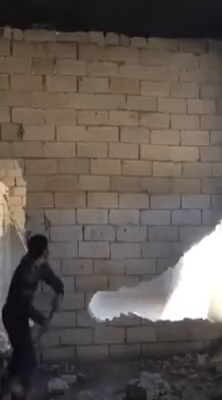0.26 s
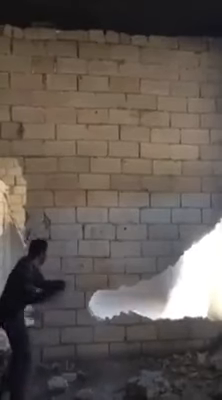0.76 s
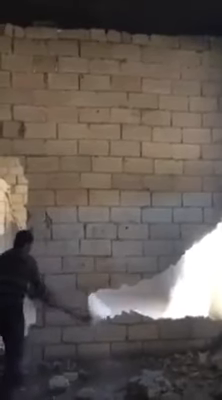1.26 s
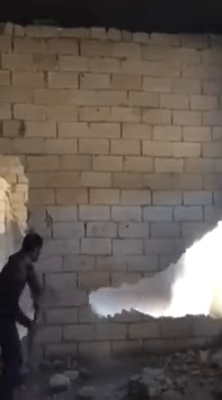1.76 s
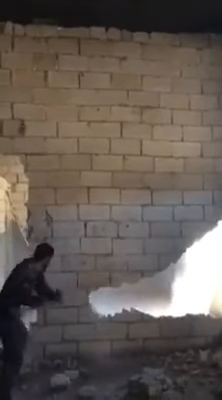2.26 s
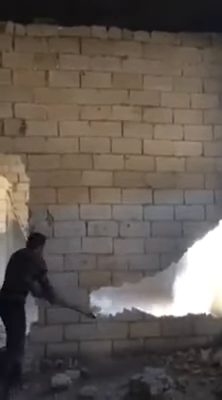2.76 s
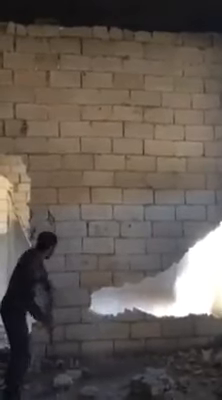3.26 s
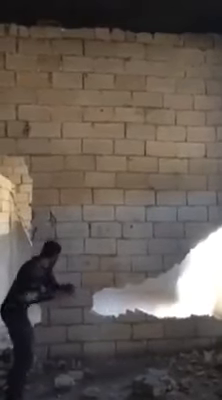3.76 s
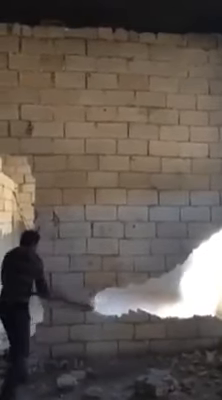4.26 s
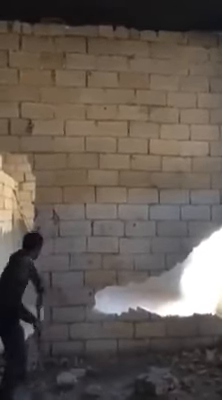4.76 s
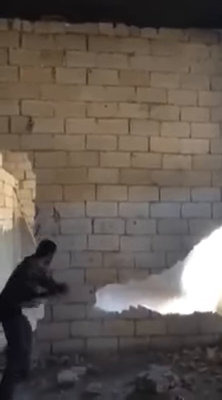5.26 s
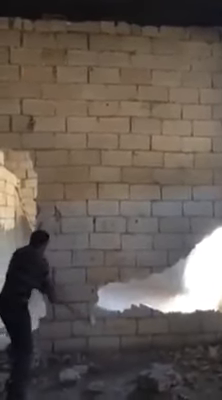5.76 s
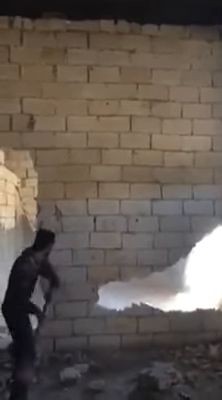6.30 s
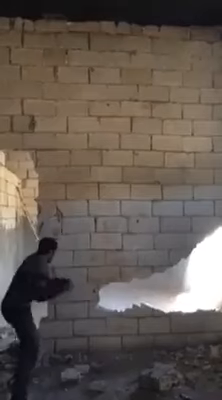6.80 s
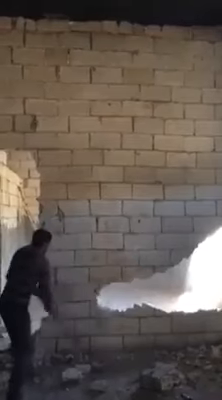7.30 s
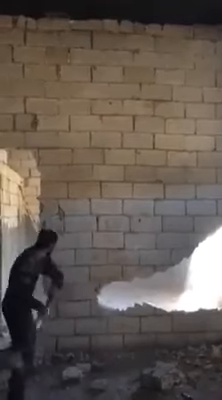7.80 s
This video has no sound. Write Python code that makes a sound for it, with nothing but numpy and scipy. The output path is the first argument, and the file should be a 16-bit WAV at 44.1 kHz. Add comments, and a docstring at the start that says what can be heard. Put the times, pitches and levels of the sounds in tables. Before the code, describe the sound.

A heavy hammer hits a concrete-block wall about every one and a half seconds. Each blow is a deep short thud with a hard knock and gritty crack, followed by fluttering slap echoes and a boomy tail lasting over a second. Between blows small chips patter down and rubble shifts faintly underfoot. The microphone stands some distance away in a bare, reverberant hall, with soft low rumble and hiss behind.

```python
"""Sledgehammer in a bare hall

A sledgehammer hits a block wall every second and a half: decaying sine thud, filtered-click knock and crack.
The reverberant field is band-wise decaying noise with sine room modes; discrete reflections are added.
Chips and shifting feet are swarms of filtered clicks; a short squeak, rumble and hiss are filtered noise.
The recorder's gain control holds the peaks down, then a soft limit and a low-pass follow."""
import sys
import numpy as np
from scipy import signal
from scipy.fft import rfft
from scipy.io import wavfile

SR = 44100
rng = np.random.default_rng(int(sys.argv[2]) if len(sys.argv) > 2 else 0)


def transcribe(u):
    """Save the signal u as a 16-bit wav file named by the first command-line argument.

    u: samples, shape (n,) or (channels, n), limited to [-1, 1]; the rate is SR.
    q: integer samples, one column per channel.
    """
    v = np.clip(np.atleast_2d(u).T, -1, 1)
    q = np.round(v * 32767).astype(np.int16)
    wavfile.write(sys.argv[1], SR, q)


N = 354563
BEFORE = 13230   # samples computed ahead of the start, so that an earlier blow still rings
M = N + BEFORE


def from_db(db):
    """Level to amplitude ratio: 20 dB is a factor of ten."""
    return 10 ** (np.asarray(db) / 20)


def rms_one(x):
    """Normalise a signal to unit effective (rms) value."""
    return x / np.sqrt(np.mean(x ** 2) + 1e-20)


def at_hz(table, hz, column=1):
    """Interpolate a table column linearly along a logarithmic frequency axis."""
    table = np.array(table)
    return np.interp(np.log(hz), np.log(table[:, 0]), table[:, column])


def band(x, low_hz, high_hz):
    """Butterworth band-pass: flat between the edges, gentle slopes outside."""
    edges = [low_hz, min(high_hz, .45 * SR)]
    return signal.sosfilt(signal.butter(2, edges, "band", fs=SR, output="sos"), x)


def fade(size, t60):
    """Exponential decay: the level falls 60 dB in t60 seconds."""
    return from_db(-60 * np.arange(size) / SR / t60)


def add(out, s, x):
    """Linear superposition: mix x into out at s seconds."""
    i = round(s * SR) + BEFORE
    out[i:i + len(x)] += x[:M - i]


def bands():
    """Half-octave analysis: lower edge, upper edge and geometric centre of each band, in Hz."""
    edges = 22 * 2 ** np.arange(0, 10, .5)
    return zip(edges, edges[1:], np.sqrt(edges[:-1] * edges[1:]))


# Spectrum of the background, before it is normalised: [f/Hz, relative density level/dB per Hz]
AIR = [(15, -42), (25, -9), (121, 14), (207, -6), (373, 0.5), (1090, -7.5), (2430, -9.5), (2700, -39),
       (3440, -9), (8000, -24), (11000, -30.5), (15000, -30)]
AIR_DB = -55   # rms level of the whole background


def air():
    """Stationary noise shaped in bands: far outdoor rumble that wavers, and the hiss of the microphone."""
    white = rng.standard_normal((2, M))
    turning_points = rng.standard_normal(40)   # 4 per second
    waver = rms_one(np.interp(np.arange(M) / SR, np.arange(40) / 4, turning_points))
    total = np.zeros(M)
    for k, (low, high, hz) in enumerate(bands()):
        level_db = at_hz(AIR, hz) + 3.7 * waver * (hz < 250)   # only the rumble wavers
        total += from_db(level_db) * band(white[k % 2], low, high)   # neighbouring bands are independent
    return from_db(AIR_DB) * rms_one(total)


# a higher thud goes with a lower knock and a stronger boom: values at a thud of THUD_HZ, slopes per Hz of thud
THUD_HZ = 160
KNOCK_HZ, KNOCK_SLOPE, BOOM_DB, BOOM_SLOPE_DB = 458, -8, -11, 0.18


def blow(thud_hz, thud_db, knock_db, crack_db, crack_hz, spray_db):
    """Impulse excitation: the panel swings, the wall booms, the block knocks, the steel cracks."""
    size = 2048
    t = np.arange(size) / SR - .010   # contact comes 10 ms in
    since = np.maximum(t + 0.0028, 0)
    onset = 1 - np.exp(-since / 0.00085)
    swing = -np.sin(2 * np.pi * thud_hz * since) * onset * np.exp(-(since / 0.011) ** 2)

    # the ground carries a weak forerunner faster than the air
    early = np.maximum(t + 0.00573, 0)
    envelope = early / 0.0021 * np.exp(-early / 0.0031)
    forerunner = from_db(-6) * np.sin(2 * np.pi * 280 * early) * envelope

    click = 1. * (np.arange(size) == 441)   # unit impulse at contact
    knock_hz = KNOCK_HZ + KNOCK_SLOPE * (thud_hz - THUD_HZ)
    boom_db = BOOM_DB + BOOM_SLOPE_DB * (thud_hz - THUD_HZ)
    boom = band(click, 67.4, 150)
    knock = band(click, knock_hz / 4.4, knock_hz * 1.647)
    crack = band(click, crack_hz / 1.7, crack_hz * 1.4)
    spray = band(click, 657, 8700)
    levels = [(boom_db, boom), (knock_db, knock), (crack_db, crack), (spray_db, spray)]
    struck = [from_db(db) * x / x.max() for db, x in levels]
    return np.array([from_db(thud_db) * (swing + forerunner), *struck])


# Late decay of the hall by frequency: [f/Hz, reverberation time t60/s, level/dB before the early boost]
HALL = [(30.4, 2.26, -36), (60, 2, -31), (120, 1.66, -35.5), (191, 1.45, -34.5), (348, 1.84, -24),
        (635, 1.553, -28), (1534, 1.417, -24.5), (2800, 1.253, -23.5), (5000, 0.68, -25), (8000, 0.25, -26),
        (13000, 1.11, -58)]
# Low resonances of the air in the hall: [f/Hz, level/dB before the early boost, t60/s]
HALL_MODES = [(69.7, -66.5, 2.7), (109.3, -67.5, 2.32), (119.3, -62.5, 2.23), (143.6, -69.5, 2.4),
              (223.5, -60, 1.58), (275.3, -67, 2.22), (340, -67.5, 2.4), (408, -65, 1.6), (504, -60, 1.82),
              (581, -60, 2.1)]


def echoes(strength, count):
    """Reverberation: dense echoes that die band by band, over slow low modes of the air."""
    size = 75000
    t = np.arange(size) / SR
    white = rng.standard_normal((2, count, size))
    out = np.zeros((count, size))
    for k, (low, high, hz) in enumerate(bands()):
        build_up = np.clip(t / (0.0027 + 4.7 / hz), 0, 1) ** 2   # the bass builds up later
        swell = build_up * fade(size, at_hz(HALL, hz))
        level = from_db(at_hz(HALL, hz, column=2)) * strength(hz)
        out += level * band(white[k % 2], low, high) * swell
    for hz, level_db, t60 in HALL_MODES:
        phase = rng.random((count, 1))   # in cycles
        ring = np.sin(2 * np.pi * (hz * t + phase)) * np.clip(t / 0.031, 0, 1) * fade(size, t60)
        out += from_db(level_db) * strength(hz) * ring
    # the struck wall and the floor nearby answer first and strongest
    close = 1 + from_db(-8.5) * fade(size, 0.33)
    return out * close


# Hammer blows; crack and spray levels precede the gain towards the microphone: [contact t/s, thud f/Hz,
# thud level/dB, knock level/dB, crack level/dB, crack f/Hz, spray of chips level/dB, chips landing level/dB]
BLOWS = [(-.17, 150, -5.5, -2, -20, 2270, 3, -47), (1.343, 166.3, -2, -3.5, -13.5, 1970, -7.5, -54.5),
         (2.8834, 133.4, -5.5, -4.5, -6.5, 3140, -2.5, -54),
         (4.4073, 156.7, -3.5, -1, -15, 2010, -0.5, -75), (5.8869, 167.2, 2.5, 0.5, -17, 2690, -2.5, -66),
         (7.337, 175, 4, 0.5, -17.5, 4040, -19, -60)]


def blows():
    """Direct sound, discrete reflections and reverberation, the last fed with the power of the five parts."""
    out = np.zeros(M)
    parts = np.array([blow(*row[1:-1]) for row in BLOWS])
    fft_size = 2 ** 14
    power = np.sum(np.abs(rfft(parts, fft_size)) ** 2, axis=1)
    tails = echoes(lambda hz: np.sqrt(power[:, [round(hz / SR * fft_size)]]), count=len(BLOWS))
    # the face of the block breaks for some ms
    size = 400
    crumble = rng.standard_normal((len(BLOWS), size)) * fade(size, .009)
    for row, (thud, boom, knock, crack, spray), grains, tail in zip(BLOWS, parts, crumble, tails):
        start = row[0] - .010
        head_on = from_db(8) * crack + from_db(-3) * spray   # the crack beams towards the microphone
        unit_grains = grains / np.linalg.norm(grains)
        sharp = knock + np.convolve(head_on, unit_grains)[:len(thud)]
        add(out, start, thud + boom + sharp)
        add(out, start + .006, from_db(-7) * sharp)   # the floor throws the crack back
        # the far end wall answers, duller
        add(out, start + 0.142, from_db(-8.5) * band(thud + sharp, 170, 3200))
        for turn in (1, 2, 3):   # the thud flutters between two facing walls
            add(out, start + .092 * turn, from_db(-1.5 - 5.3 * turn) * band(thud, 68, 260))
        add(out, row[0], tail)
    return out


# Rubble sliding or shifting underfoot: [t/s, level at the crest of each grit layer/dB, fall time constant/s,
# centre f/Hz]; the broad layer has a further offset
RUBBLE = [(0.05, -37, .1, 3350), (.54, -61.5, 0.14, 8400), (0.959, -52.5, 0.0038, 2330),
          (1.189, -61.5, 0.051, 5760), (1.25, -53.5, .014, 8500), (1.92, -63, 0.16, 5000),
          (2.07, -58, 0.094, 3600), (2.512, -54.5, 0.049, 2570), (2.672, -61, 0.056, 6060),
          (2.78, -58.5, 0.3, 3960), (3.47, -50.5, .096, 4300), (3.6, -61, 0.22, 5000),
          (3.778, -84, 0.027, 4100), (4.05, -60.5, 0.023, 2940), (4.179, -58.5, 0.092, 3560),
          (4.25, -42.5, 0.023, 5560), (4.295, -43, 0.0094, 710), (5.118, -64, 0.051, 5000),
          (5.605, -62, 0.014, 2090), (5.755, -60, 0.1, 2800), (6.37, -62, .04, 8000),
          (7.115, -73, 0.013, 5000), (7.255, -60.5, 0.037, 1990), (7.742, -42.5, 0.034, 6140),
          (7.848, -56, 0.12, 5500), (7.951, -50.5, 0.028, 6000)]
# chips reach the floor after each blow, and trickle on: delay, fall time constant, centre frequency
CHIPS_DROP_S, CHIPS_LAST_S, CHIPS_HZ = .335, 0.16, 6600
SLIDE_RISE_S, SLIDE_EASE = 0.017, 0.92   # every slide swells alike: time, and power of the ramp
GRIT_DB, GRIT_DB_PER_OCTAVE = -5.5, 4   # broad grit under a 5 kHz slide; finer pieces carry more


def rubble():
    """Shot noise: each slide is a swarm of uneven clicks, coloured by the size of the pieces."""
    out, size = np.zeros(M), 24000
    landings = [(row[0] + CHIPS_DROP_S, row[-1], CHIPS_LAST_S, CHIPS_HZ) for row in BLOWS]
    slides = RUBBLE + landings
    t, shape = np.arange(size) / SR, (len(slides), size)
    sizes_db = 4.5 * np.minimum(rng.exponential(1, shape), 4.0)
    sizes = from_db(sizes_db) * rng.choice([-1, 1], shape)
    clicks = (rng.random(shape) < 6000 / SR) * sizes   # 6000 per second on average
    for (s, crest_db, fall, centre_hz), swarm in zip(slides, clicks):
        rise = np.minimum(t / SLIDE_RISE_S, 1) ** SLIDE_EASE
        swell = rise * np.exp(-np.maximum(t - SLIDE_RISE_S, 0) / fall)
        grit = rms_one(band(swarm, centre_hz / 5.5, centre_hz * 1.35))
        broad_db = GRIT_DB + GRIT_DB_PER_OCTAVE * np.log2(centre_hz / 5000)
        broad = from_db(broad_db) * rms_one(band(swarm, 500, 16400))
        add(out, s, from_db(crest_db) * swell * (grit + broad))
    return out


# One short high squeak: [f/Hz, level at the crest/dB, length/s]
SQUEAK = (6400, -69, 0.045)
SQUEAK_S = 6.705   # start


def squeak():
    """Narrow-band noise under a raised-cosine swell gives a short tone of wavering pitch."""
    hz, level_db, length = SQUEAK
    out, size = np.zeros(M), 4000
    swell = np.sin(np.pi * np.minimum(np.arange(size) / SR / length, 1)) ** 2
    tone = rms_one(band(rng.standard_normal(size), hz * .96, hz * 1.04))
    add(out, SQUEAK_S, from_db(level_db) * swell * tone)
    return out


def scene():
    """Superpose all sources; convolution with an impulse response places the small sounds in the hall."""
    small = rubble() + squeak()
    response = echoes(lambda hz: 1, count=1)[0]
    small = small + from_db(-2) * signal.fftconvolve(small, response)[:M]
    return (blows() + small + air())[None, BEFORE:]


CUTOFF_HZ = 15500


def record(dry):
    """Compression: gain drops fast on a peak and recovers slowly; peaks are rounded, the top is cut."""
    ramp = 40 * np.arange(N) / SR   # the held excess falls 40 dB per s; the gain moves by half of it
    over_db = np.maximum(20 * np.log10(np.abs(dry[0]) + 1e-9) + 6, 0)   # excess above -6 dB
    excess_db = np.maximum.accumulate(over_db + ramp) - ramp
    r = np.exp(-1 / (0.025 * SR))   # 25 ms smoothing
    smooth_db = signal.lfilter([1 - r], [1, -r], excess_db)
    held = dry * from_db(-.5 * smooth_db)
    rounded = 1.074 * np.tanh(held / 1.195)
    return signal.sosfilt(signal.cheby2(16, 60, CUTOFF_HZ, fs=SR, output="sos"), rounded)


dry = scene()
out = record(dry)
transcribe(out)
```